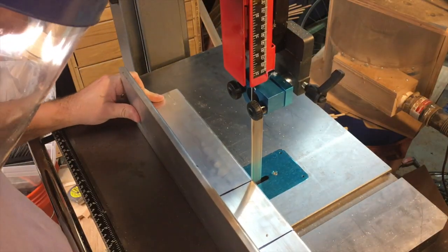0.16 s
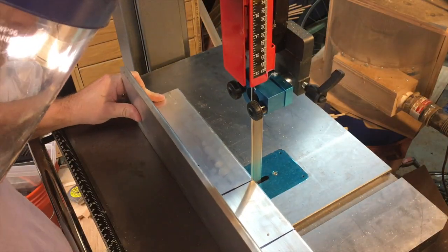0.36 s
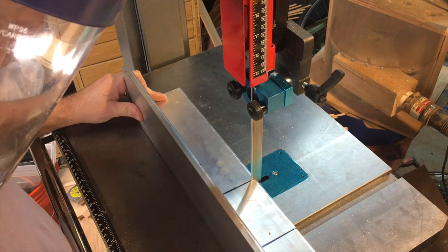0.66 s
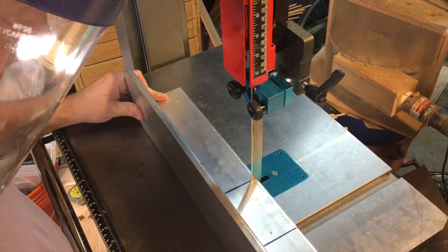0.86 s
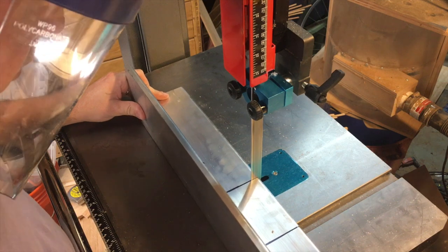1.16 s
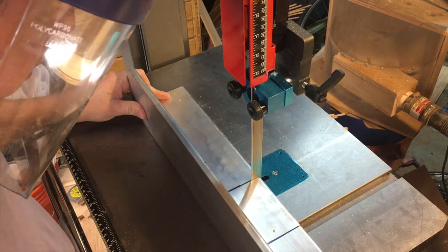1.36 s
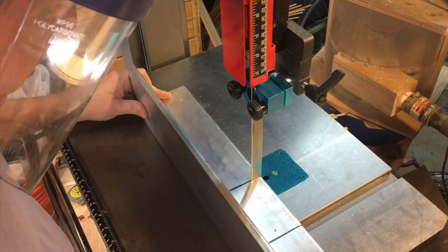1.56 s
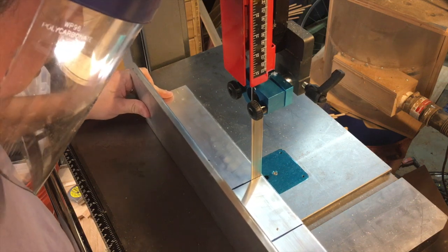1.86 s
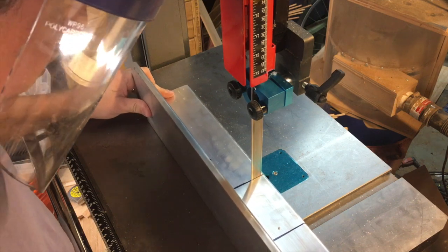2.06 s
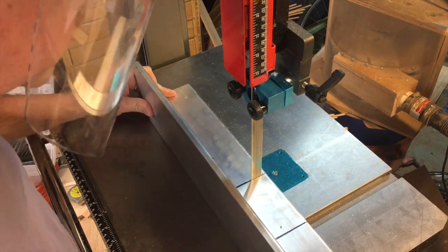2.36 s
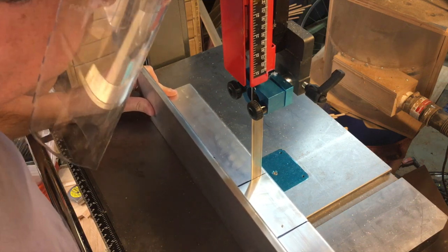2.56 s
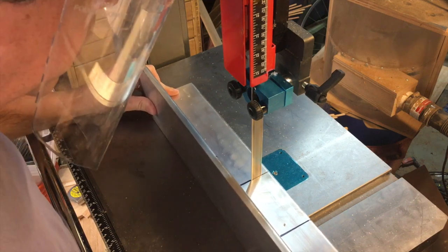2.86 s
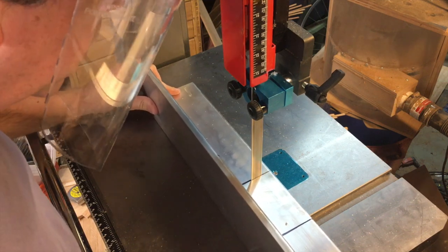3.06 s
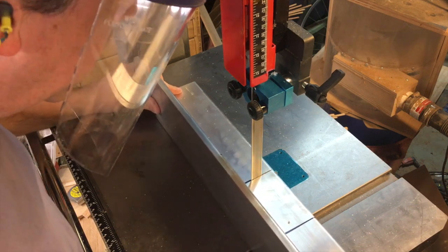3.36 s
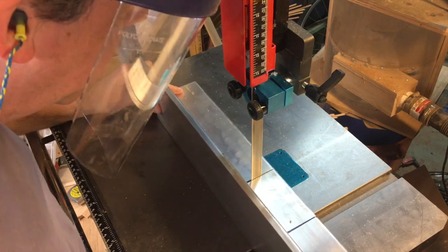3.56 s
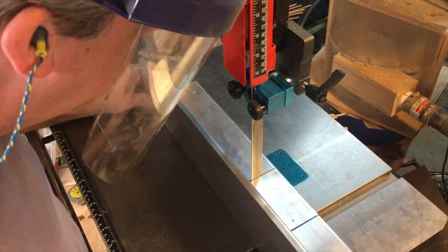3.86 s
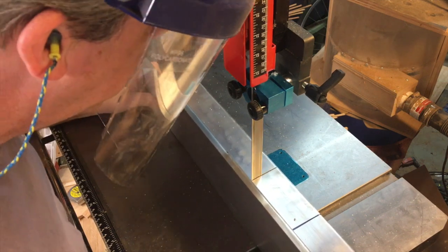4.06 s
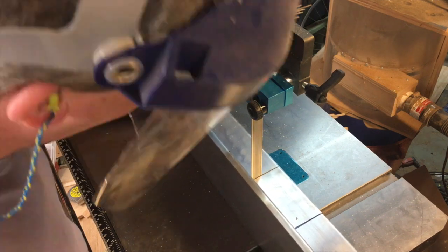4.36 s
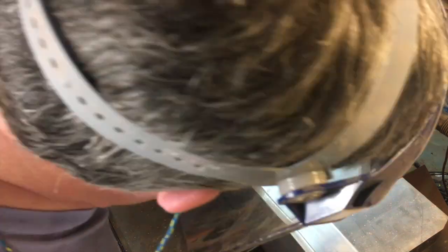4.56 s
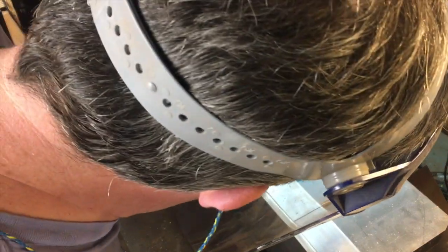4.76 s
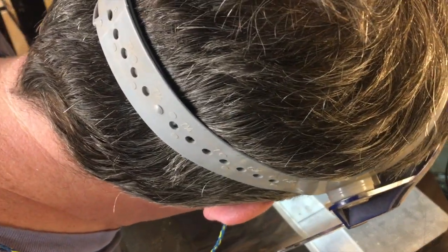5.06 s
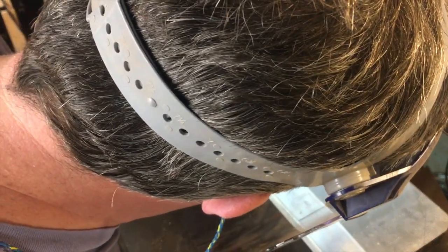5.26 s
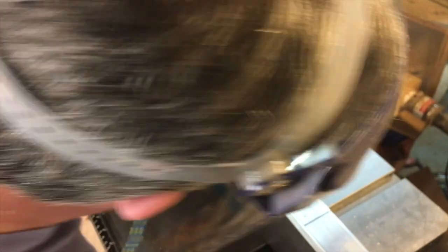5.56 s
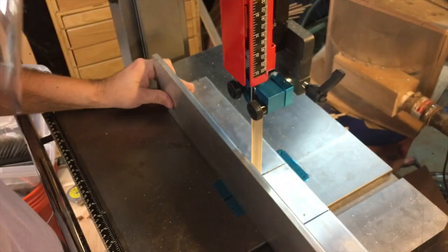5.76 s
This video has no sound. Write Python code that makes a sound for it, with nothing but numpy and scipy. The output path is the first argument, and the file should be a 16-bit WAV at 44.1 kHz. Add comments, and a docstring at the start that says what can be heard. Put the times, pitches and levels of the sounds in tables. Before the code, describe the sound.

A small bandsaw cuts aluminium with a bright, hissing metallic scrape over a steady whine and drone, easing off towards the end.

```python
"""Bandsaw cutting an aluminium angle

A small bandsaw cuts in a home workshop, with a dust extractor whining beside it. Noise shaped by the
teeth's bite gives scrape and hiss, in a pattern that returns on every lap of the blade. It also rings
resonances: the blade's die away as the kerf closes round it, the workpiece's swell and fade in turn.
The wheels drone as fluttering tones, noise rattles the frame, and clicks slap it once a wheel turn.
The hollow of a face shield hums as it moves past."""
import sys
import numpy as np
from scipy import signal
from scipy.fft import rfft, irfft, next_fast_len
from scipy.io import wavfile

SR = 44100
rng = np.random.default_rng(int(sys.argv[2]) if len(sys.argv) > 2 else 0)


def pcm_store(signal):
    """Save signal as 16-bit PCM."""
    levels = np.round(np.clip(np.atleast_2d(signal), -1, 1) * 32767)
    wavfile.write(sys.argv[1], SR, levels.astype(np.int16).T)


N = 261513
TIME = np.arange(N) / SR
SINGING_ORDER, TURNS_PER_LAP, TOOTH_GROUPS_PER_LAP = 36, 7, 54

# Shaking of the running machine, used as swing about its mean. Each row: time in seconds, level in dB.
MACHINE_SHAKING = [(0.0, -42), (2.56, -38.5), (5.93, -37.5)]
# Frame resonances. Each row: centre in Hz, width in Hz, slap level in dB, shaking level in dB;
# both levels against machine_level_db().
FRAME_MODES = [(940, 56, -8.5, -2), (1554.9, 41.6, -17.5, -7.5)]


def from_db(db):
    """Amplitude ratio of a level in dB."""
    return np.exp(np.asarray(db) * (np.log(10) / 20))


def rms_one(x):
    """Scale x to rms 1."""
    return x / np.sqrt(np.mean(x ** 2) + 1e-20)


def in_time(rows):
    """Columns of a curve table, one value per sample."""
    time_s, *columns = np.transpose(rows)
    return [np.interp(TIME, time_s, column) for column in columns]


def swing_db(curve):
    """A level curve in dB about its mean, one value per sample."""
    db = in_time(curve)[0]
    return db - db.mean()


def swell(start_s, end_s, attack_s, release_s):
    """Linear attack, hold and release between two times; height 1."""
    rise = (TIME - start_s) / attack_s
    fall = (end_s - TIME) / release_s
    return np.clip(np.minimum(rise, fall), 0, 1)


def bell(centre_s, half_s):
    """Smooth hump of height 1, halved half_s either side of its centre."""
    return .5 ** (((TIME - centre_s) / half_s) ** 2)


def drift(rate_hz):
    """Random wander through 2 * rate_hz knots a second; rms 1."""
    knots = rng.standard_normal(int(2 * rate_hz * TIME[-1]) + 2)
    return rms_one(np.interp(2 * rate_hz * TIME, np.arange(len(knots)), knots))


def repeating(turns, count):
    """Random profile of count bumps that comes round once a turn; rms 1."""
    bumps = rng.standard_normal(count)
    closed = np.append(bumps, bumps[0]) - bumps.mean()
    return rms_one(np.interp(turns % 1, np.arange(count + 1) / count, closed))


def coloured(x, spectrum):
    """Give x a smooth spectrum; rms 1."""
    size = next_fast_len(N + 4096)
    hz, db = np.transpose(spectrum)
    log_hz = np.log(np.fft.rfftfreq(size, 1 / SR) + 1)
    gain = from_db(np.interp(log_hz, np.log(hz), db))
    return rms_one(irfft(rfft(x, size) * gain, size)[:N])


def resonate(x, hz, width_hz):
    """Steep-sided resonance: two equal poles round a carrier whose pitch may move; rms 1."""
    carrier = np.exp(2j * np.pi * np.cumsum(hz * np.ones(len(x))) / SR)
    r = np.exp(-np.pi * np.sqrt(2) * width_hz / SR)
    baseband = signal.lfilter([1], [1, -2 * r, r * r], x / carrier)
    return rms_one((baseband * carrier).real)


def tone(cycles, flutter):
    """Machine tone that flutters in level and phase; rms near 1."""
    phase = 2 * np.pi * cycles
    wave = (1 + flutter * drift(7)) * np.cos(phase) + flutter * drift(7) * np.sin(phase)
    return np.sqrt(2 / (1 + 2 * flutter ** 2)) * wave


def friction(bite, uneven_db=1.52):
    """Tearing metal gives a random, uneven force as strong as the bite."""
    return bite * from_db(uneven_db * drift(100)) * rng.standard_normal(N)


def mode(bite, strength, hz, width_hz):
    """One resonance rubbed by the teeth, sounding while its strength is worth hearing."""
    out, on = np.zeros(N), strength > .04
    out[on] = strength[on] * resonate(friction(bite)[on], (hz * np.ones(N))[on], width_hz)
    return out


def tooth_bites(turns, lap_db=1.2554, wheel_db=1.0, group_db=1.5, snag_s=0.0086):
    """Bite follows the tooth groups, wheel wobble, wear along the blade and snags; rms 1."""
    # Teeth snag on chips. Each row: time in seconds, extra bite in dB.
    snags = [(1.186, 3), (1.293, 1), (1.403, 0), (1.559, 3.5), (2.572, 5), (2.669, 2.5), (3.071, 3.5),
             (3.118, 3), (3.198, 6), (3.279, 5)]
    laps = turns / TURNS_PER_LAP
    bite_db = lap_db * repeating(laps, count=260) + wheel_db * repeating(turns, count=24)
    bite_db += group_db * np.cos(2 * np.pi * TOOTH_GROUPS_PER_LAP * laps)
    for time_s, extra_db in snags:
        bite_db += extra_db * np.exp(-((TIME - time_s) / snag_s) ** 2)
    return rms_one(from_db(bite_db))


def blade_ring(bite, sharp_percent=1.8):
    """The deepening kerf damps the blade's ring; when it binds it tightens and rings louder."""
    # Blade modes. Each row: centre in Hz, width in Hz, level at first in dB, seconds until 6 dB weaker.
    blade_modes = [(3370, 300, -42, 2.0), (6610, 330, -28.5, 2.0), (8060, 150, -34.5, 1.4),
                   (11400, 320, -33, 2.1), (12330, 280, -40.5, 1.9), (14380, 250, -45.5, 1.8),
                   (9750, 700, -36, 1.7)]
    # The blade binds in the kerf. Each row: centre in seconds, half length in seconds, extra level in dB.
    binds = [(1.344, .17, 2.5), (2.651, 0.04, 7), (3.15, .17, 3)]
    flare = from_db(sum(db * bell(time_s, half_s) for time_s, half_s, db in binds))
    sharp = 1 + sharp_percent / 100 * sum(bell(time_s, half_s) for time_s, half_s, _ in binds)
    ring = np.zeros(N)
    for hz, width_hz, db, fade_s in blade_modes:
        ring += from_db(db) * mode(bite, bell(0, fade_s), hz * sharp, width_hz)
    return flare * ring


def work_ring(bite):
    """Each workpiece mode swells and fades as the teeth travel through its antinode."""
    # Workpiece modes. Each row: centre in Hz, width in Hz, level at the antinode in dB,
    # time of passing it in seconds, seconds from there until 6 dB weaker.
    work_modes = [(6687, 9, -35, 1.4, 2.0), (12315, 55, -37, .2, 1.0), (2917, 35, -42.5, 2.9, .75),
                  (9930, 60, -42, 2.5, .6), (2560, 200, -45, 4.3, .8), (3500, 400, -41, 3.4, .35),
                  (3970, 110, -39.5, 2.27, .33), (5280, 180, -45, 4.1, .7), (5620, 380, -39, 5.05, .55),
                  (6560, 450, -37.5, 3.2, .65), (6850, 400, -42, 4.5, .8), (6980, 500, -32.5, 1.9, .35),
                  (8650, 130, -42, 2.3, .7), (9410, 140, -39.5, 2.15, .55), (10150, 550, -36.5, 2.5, .5),
                  (11780, 400, -40, 5.6, .8), (12120, 380, -39.5, 4.42, .28)]
    ring = np.zeros(N)
    for hz, width_hz, db, pass_s, half_s in work_modes:
        ring += from_db(db) * mode(bite, bell(pass_s, half_s), hz, width_hz)
    return ring


def cutting(turns):
    """Chips tear off with a broad scrape and a fine hiss, and the same bites ring the metal."""
    # Effort of the cut, used as swing about its mean. Each row: time in seconds, level in dB.
    effort_curve = [(0.0, -34.5), (0.91, -33.5), (1.83, -31), (2.26, -31.5), (4.05, -36.5), (4.41, -37.5),
                    (5.85, -41.5), (5.93, -44)]
    # Scrape spectrum. Each row: frequency in Hz, relative density in dB per Hz.
    scrape_spectrum = [(300, -69), (1200, -17.5), (3000, -6), (4800, -11.5), (5300, -3.5), (5950, -5.5),
                       (6750, 5), (7500, 1), (8200, -1), (9000, -2), (9900, 2), (10700, -8), (12000, -41),
                       (15000, -52)]
    # Hiss spectrum. Each row: frequency in Hz, relative density in dB per Hz.
    hiss_spectrum = [(2000, -52), (8000, -30), (10800, 1), (11800, 8), (12900, 5.5), (13400, -1.5),
                     (14300, 8), (15100, 3), (16000, -2)]
    bite, effort_db = tooth_bites(turns), swing_db(effort_curve)
    # level at mean effort, and share of the effort's swing
    scrape_db = -30 + 0.49 * effort_db
    hiss_db = -35.5 + 0.62 * effort_db
    scrape = from_db(scrape_db) * coloured(friction(bite), scrape_spectrum)
    hiss = from_db(hiss_db) * coloured(friction(bite), hiss_spectrum)
    return scrape + hiss + blade_ring(bite) + work_ring(bite)


def machine_level_db():
    """Reference level for rattle, drone and slaps; it follows the machine's shaking."""
    return -38.5 + swing_db(MACHINE_SHAKING)


def frame(turns, rattle_above_db=7.5, grain_db=1.5):
    """Bearings and guides shake the frame and its resonances; the stand rumbles below."""
    # Rattle spectrum. Each row: frequency in Hz, relative density in dB per Hz.
    rattle_spectrum = [(300, -30.5), (520, -7.5), (680, -4.5), (800, -0.5), (1000, 2), (1220, -0.5),
                       (1290, -7.5), (1360, 0), (1850, -5.5), (2400, -2.5), (3200, -9), (3850, -3.5),
                       (4500, -6), (9000, -11)]
    # Rumble spectrum. Each row: frequency in Hz, relative density in dB per Hz.
    rumble_spectrum = [(25, 8), (80, -11.5), (120, -10.5), (160, -14.5), (198, 4), (235, 4), (260, -3.5),
                       (310, 1), (450, -9), (600, -14), (900, -48)]
    level_db = machine_level_db()
    rumble_db = -50 + 0.92 * swing_db(MACHINE_SHAKING)
    grain = from_db(grain_db * repeating(turns, count=24))
    rattle = coloured(grain * rng.standard_normal(N), rattle_spectrum)
    out = from_db(level_db + rattle_above_db) * rattle
    for hz, width_hz, _, shaking_db in FRAME_MODES:
        out += from_db(level_db + shaking_db) * resonate(friction(grain), hz, width_hz)
    return out + from_db(rumble_db) * coloured(rng.standard_normal(N), rumble_spectrum)


def wheels(turns, orders_db=-3.0):
    """Clean drone of wheels, belt and passing tooth groups; one order sings out under the push."""
    # Wheel and belt tones. Each row: multiple of the wheel rate, relative level in dB.
    wheel_orders = [(33.42, -8), (35, -1), (35.5, -14), (37, -7.5), (42, -14), (44, -13), (45, -16),
                    (48, -6.5), (82.4, -9.5), (91, -18), (101, -18), (109, -42), (113, -10), (136, -28)]
    # Hum of the tooth groups. Each row: multiple of their rate, level in dB.
    tooth_hum = [(1, -68.5), (2, -59), (3, -55.5), (4, -46.5), (7, -54)]
    level_db = machine_level_db()
    # slow swell, hold and quick drop of the hard push, over a steady light push
    start_s, release_s = .22, .24
    push = from_db(-32) * swell(start_s, 2.378, 1.46, release_s)
    push += from_db(-43.5) * swell(start_s, np.inf, release_s, release_s)
    out = push * tone(SINGING_ORDER * turns, flutter=0.07)
    for order, db in wheel_orders:
        out += from_db(level_db + db + orders_db) * tone(order * turns, flutter=0.363)
    group_cycles = TOOTH_GROUPS_PER_LAP * turns / TURNS_PER_LAP
    for order, db in tooth_hum:
        out += from_db(db) * tone(order * group_cycles, flutter=0.54)
    return out


def extractor():
    """The fan has its own motor and holds a clean whine, creeping up to speed."""
    # Fan whine. Each row: time in seconds, pitch in Hz, level in dB.
    fan_curve = [(0.0, 1394, -37.5), (0.79, 1397, -37.5), (2.56, 1400, -35.5), (5.93, 1405, -33.5)]
    hz, db = in_time(fan_curve)
    return from_db(db) * tone(np.cumsum(hz) / SR, flutter=0.041)


def slaps(turns, uneven_db=0.46, extra_swing=0.63):
    """The blade slaps its guide once a wheel turn and rings the frame, repeating every lap."""
    # Slap on each turn of a lap. Each entry: relative level in dB.
    lap_pattern_db = [-4, 0, -3, -7, 0, -5, -3]
    turn = np.floor(turns).astype(int)
    at = np.flatnonzero(np.diff(turn)) + 1
    pattern_db = np.take(lap_pattern_db, turn[at], mode="wrap")
    clicks = np.zeros(N)
    clicks[at] = from_db(pattern_db + uneven_db * rng.standard_normal(len(at)))
    clicks += 1e-18  # avoids denormals
    level_db = machine_level_db() + extra_swing * swing_db(MACHINE_SHAKING)
    out = np.zeros(N)
    for hz, width_hz, slap_db, _ in FRAME_MODES:
        out += from_db(level_db + slap_db) * resonate(clicks, hz, width_hz)
    return out


def workshop(x, t60_s=0.19, wet_db=-11.0):
    """Dense reflections from the table and near walls: decaying noise after a 2 ms gap."""
    t = TIME[:SR // 2]
    tail = rng.standard_normal(len(t)) * from_db(-60 * t / t60_s) * (t > .002)
    wet = signal.fftconvolve(x, tail / np.sqrt(np.sum(tail ** 2)))[:N]
    return (x + from_db(wet_db) * wet) / np.sqrt(1 + from_db(wet_db) ** 2)


def face_shield():
    """Air in the hollow behind the visor hums on each pass, its pitch sliding as the head moves."""
    # Air resonance, set by where the head is. Each row: time in seconds, pitch in Hz.
    pitch_curve = [(.72, 338), (1.05, 376), (4.39, 415), (4.52, 326), (4.72, 318), (5.1, 287)]
    # The shield passes close by. Each row: start in seconds, end in seconds, level in dB.
    passes = [(.66, 1.348, -58), (4.3, 5.4, -53)]
    level = np.zeros(N)
    for start_s, end_s, db in passes:
        level += from_db(db) * swell(start_s, end_s, attack_s=.12, release_s=.35)
    return level * tone(np.cumsum(in_time(pitch_curve)[0]) / SR, flutter=.15)


def head_shadow(x, loss_db=2, edge_hz=10420, move_s=.15):
    """The head leans between cut and microphone and shades the highest treble."""
    highpass = signal.butter(4, edge_hz, "high", fs=SR, output="sos")
    treble = signal.sosfiltfilt(highpass, x)
    in_way = swell(4.5, 6.0, move_s, move_s)
    return x + (from_db(-loss_db * in_way) - 1) * treble


def scene(first_turn=-.2):
    """One wheel speed drives the blade, the drone and the rattle."""
    # Wheel speed. Each row: time in seconds, pitch of the singing wheel order in Hz.
    speed_curve = [(0.0, 932.0), (0.13, 929.8), (5.0, 926.0), (5.93, 931.0)]
    turns = first_turn + np.cumsum(in_time(speed_curve)[0]) / SINGING_ORDER / SR
    reflected = head_shadow(workshop(cutting(turns) + frame(turns)))
    direct = slaps(turns) + wheels(turns) + extractor() + face_shield()
    return (reflected + direct)[None]


def record(dry):
    """A small microphone thins the bass; the top is cut steeply."""
    highpass = signal.butter(2, 157, "high", fs=SR, output="sos")
    lowpass = signal.ellip(12, .1, 90, 15800, fs=SR, output="sos")
    return signal.sosfilt(lowpass, signal.sosfilt(highpass, dry))


dry = scene()
out = record(dry)
pcm_store(out)
```